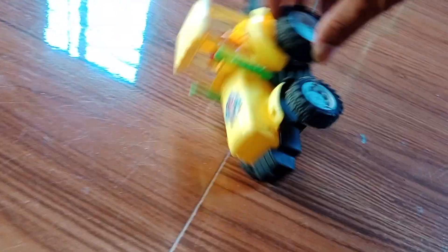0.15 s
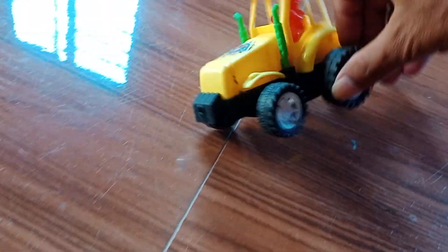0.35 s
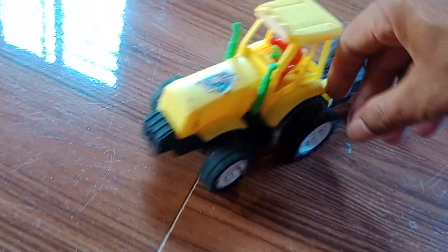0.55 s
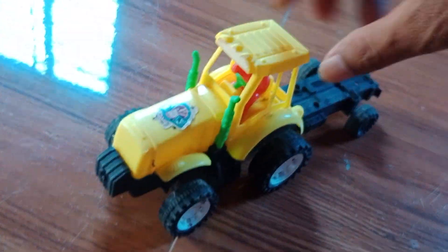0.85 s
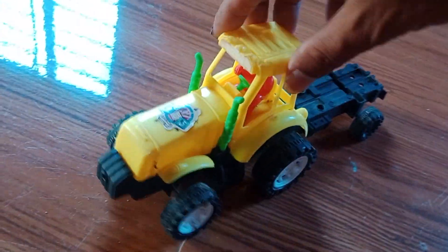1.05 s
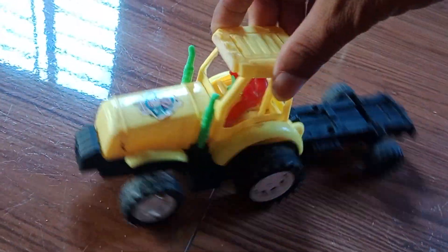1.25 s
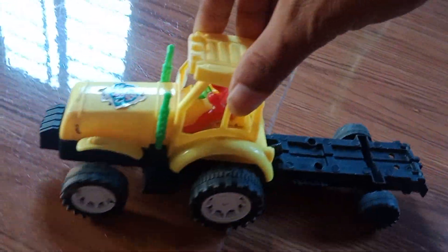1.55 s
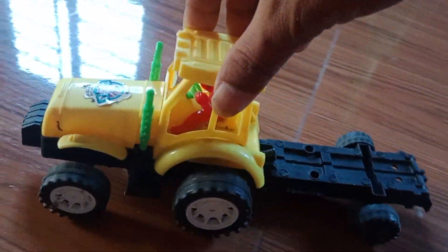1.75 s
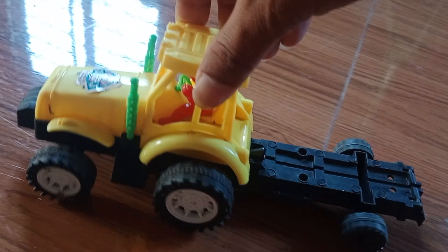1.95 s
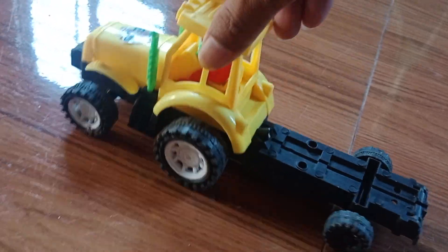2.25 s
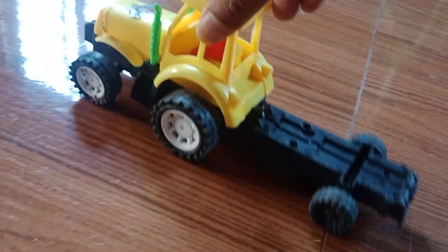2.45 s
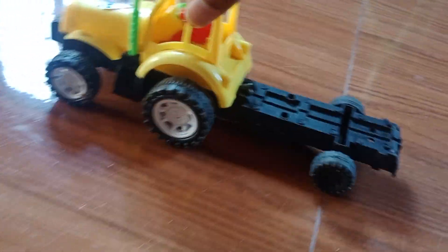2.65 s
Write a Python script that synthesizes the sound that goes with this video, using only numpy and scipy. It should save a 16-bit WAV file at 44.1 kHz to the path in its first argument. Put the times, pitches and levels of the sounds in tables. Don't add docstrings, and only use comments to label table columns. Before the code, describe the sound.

Plastic toy wheels scrape across a wooden floor, with clattering first, a brief lull, then steady grinding

```python
import sys
import numpy as np
from scipy import signal
from scipy.fft import rfft, irfft
from scipy.io import wavfile
from scipy.ndimage import uniform_filter1d

SR = 44100
rng = np.random.default_rng(int(sys.argv[2]) if len(sys.argv) > 2 else 0)


def generate_wav(signal):
    frames = np.transpose(np.atleast_2d(signal))
    scaled = np.clip(frames, -1, 1) * 32767
    pcm = np.round(scaled).astype(np.int16)
    wavfile.write(sys.argv[1], SR, pcm)


def field_ratio(decibels):
    return 10 ** (np.asarray(decibels, dtype=float) / 20)


N = 123479

# columns pitch_hz, level_db
ROOM_SPECTRUM = [(40, -14), (110, 3), (500, -8), (1500, 5), (3000, -16), (6600, -28), (7800, -1.5),
                 (15000, -11)]
# columns time_s, level_db, high_boards_db
FLOOR_LOAD = [(0, -57.5, 0), (.1, -58, -28), (.22, -59, -6), (.27, -63.5, -11), (.8, -62.5, -12.5),
              (.87, -70, -26), (.97, -74.5, -3), (1.12, -61.5, -7.5), (1.42, -65, -11.5), (1.6, -49, -13),
              (1.7, -48.5, -4), (1.78, -71, 12), (2.0, -57, -11), (2.3, -60, 8), (2.37, -63, -16),
              (2.6, -56, -4), (2.7, -51.5, -10), (2.8, -54, -2)]
# columns pitch_hz, width_hz, level_db
LOW_BOARD_MODES = [(101.4, 6.5, 9.5), (118.4, 71, 3.5), (162, 75, -10)]
HIGH_BOARD_MODES = [(224, 30, 1.5), (307, 27.4, 1.5)]
# columns start_s, length_s, first_hz, last_hz, level_db
BOARD_THRUMS = [
    (1.68, 0.21, 335, 320, -45.5),
    (1.9, 0.425, 315, 240, -51),
    (1.8, 0.19, 228, 223, -52.5),
    (2.4, .11, 221.4, 229, -50),
    (2.61, 0.182, 295, 370, -48.5),
    (1.56, 0.068, 130, 116, -49),
    (1.64, 0.1, 100, 104, -48),
    (2.62, 0.22, 130, 119, -49.5),
    (2.33, .08, 230, 207, -58),
]
# columns start_s, peak_db, pitch_hz, length_ms
WHEEL_KNOCKS = [(.0, -37.5, 2770, 9), (0.234, -19, 2600, 3.7), (.599, -38, 1330, 4.5),
                (.617, -28, 2600, 4.9), (.618, -27.5, 1420, 5), (.78, -37.5, 1240, 16),
                (.978, -63, 1900, 3), (.999, -44, 1330, 9.8), (1.021, -48, 1300, 6.5),
                (1.068, -45, 800, 11), (1.2, -35, 1300, 3.7), (1.089, -38, 2990, 5.4),
                (1.359, -41, 1270, 4)]
# columns start_s, peak_db, crack_hz
PART_TICKS = [(.001, -40, 8700), (.009, -45, 10000), (.035, -48, 8000), (.066, -38, 10600),
              (.098, -42, 9000), (.104, -42, 11000), (.117, -39, 12000), (.128, -39, 9000),
              (.15, -36, 10500), (.168, -33.5, 10100), (.185, -34.5, 9000), (.204, -38, 10500),
              (0.235, -33.5, 8800), (.286, -41, 12000), (.306, -42, 12500), (.368, -44, 9000),
              (.435, -42, 10000), (.579, -58, 10000), (.6, -42, 7400), (.652, -51.5, 11000),
              (.707, -61, 9000), (.8, -63, 9000), (.899, -67, 10000), (1.022, -63, 11000),
              (1.09, -37.5, 8800), (1.179, -47, 10000), (1.397, -40, 8460), (1.43, -41, 9000),
              (1.93, -40, 7500), (2.064, -37, 8200)]
# columns pitch_hz, level_db
TICK_SPECTRUM = [(1500, -30), (3000, -9), (6300, -9), (8000, 0), (10000, -2), (12500, -5), (15500, -9)]
# columns start_s, length_s, first_hz, last_hz, level_db
TYRE_SQUEAKS = [(.835, 0.088, 1600, 1690, -58.5), (.65, 0.27, 3900, 3670, -74.5),
                (.69, 0.18, 3230, 3200, -75), (.71, 0.096, 2500, 2680, -68), (.845, .11, 3340, 3200, -76.5),
                (.88, 0.095, 2520, 2290, -73), (.895, .09, 4620, 4580, -76),
                (.94, 0.065, 1290, 1284, -64.5), (.96, .1, 2290, 2175, -72), (1.01, 0.118, 760, 793, -49.5),
                (1.2, 0.096, 760, 790, -48.5), (2.56, 0.14, 2075, 2100, -47.5)]
# columns time_s, force_db, speed_tilt_db_per_octave, cab_boom_db
CONTACT = [(.05, -48.5, -1.5, -1), (.085, -35, -5, 0), (.18, -35.5, 1.5, 5), (.33, -40.5, 1.5, -4),
           (0.537, -37.5, 0, -13.5), (.59, -47, -1.5, -12), (0.625, -39, -6, -11), (.84, -55, -15.5, 1.5),
           (.95, -79, -11, 13), (1.041, -46, -11.5, -1.5), (1.21, -40.5, -8, 0), (1.411, -37.5, -2.5, -2.5),
           (1.659, -34.5, -3.5, -8), (1.709, -30, -1.5, -6), (2.04, -28, -0.6, -2),
           (2.48, -34, -2.5, -11.5), (2.6, -32, -4.5, -8), (2.8, -36, -3, -3)]
# columns from_s, to_s
HAND_HOLDS = [(0, .07), (.07, .3), (.3, .58), (.58, .84), (.84, 1.0), (1.0, 1.19), (1.19, 1.4), (1.4, 1.69),
              (1.69, 1.79), (1.79, 1.9), (1.9, 2.11), (2.11, 2.4), (2.4, 2.56), (2.56, 2.9)]
# columns pitch_hz, level_db
BODY_SPECTRUM = [(300, -18), (600, -14), (800, -5.5), (1500, -1), (2600, -3.5), (4200, -10.5), (7500, -23),
                 (15000, -46)]
# columns pitch_hz, width_hz, level_db
FIZZ_MODES = [(7090, 790, -14.5), (8220, 1210, -17), (9350, 280, -19.5), (12400, 620, -32)]
# columns pitch_hz, width_hz, level_db
LIFT_MODES = [
    [(774, 26, 10), (1330, 105, 10.5)],
    [(806, 123, -6), (1129, 43, 2), (1380, 180, -2.5), (1614, 100, -3), (2510, 110, -3), (2804, 110, 1)],
    [(970, 43, 1), (1395, 130, -0.5), (1690, 190, -2.5), (2290, 170, -4.5), (2800, 320, -9.5),
     (3200, 230, -17)],
    [(778, 130, 7.5), (1240, 260, 3), (1900, 100, -10), (3780, 100, -12)],
    [(1300, 100, 2), (2330, 120, -12)],
    [(790, 54, 2.5), (1290, 162, 4.5), (1860, 100, -9), (2170, 200, -3), (3000, 310, -10), (3900, 60, -17)],
]
# columns pitch_hz, width_hz, level_db
PUSH_MODES = [
    [(785, 59, -4), (1290, 310, -6.5), (1780, 150, -12), (2330, 230, -11), (2930, 460, -20)],
    [(726, 35, -1), (1424, 260, -1.5), (2370, 200, -2.5), (3300, 80, -8)],
    [(715, 65, -8), (1010, 47, -5), (1450, 120, -14), (2100, 60, -17), (2346, 180, 1.5)],
    [(990, 60, -10), (1457, 210, -2), (2350, 76, -5), (2650, 96, -2), (4080, 150, -14)],
    [(705, 93, -8), (911, 25, 0.5), (1430, 46, -6), (1534, 240, -2.5), (2240, 71, 0), (2500, 170, -4),
     (4060, 110, -17)],
    [(720, 80, -7), (1260, 80, -7), (1560, 120, -1.5), (1950, 63, -6), (2300, 76, -7), (2650, 160, -7),
     (2970, 90, -3.5)],
    [(1200, 100, -10), (1490, 120, -7), (2010, 55, -6), (2780, 370, -6)],
    [(760, 105, -5), (1470, 120, -5), (2600, 640, -17), (3950, 200, -11)],
]
# columns pitch_hz, width_hz, depth (0-1)
PORT_NOTCHES = [(4864, 1500, 0.86), (4870, 690, 0.55), (9390, 700, 0.8), (11350, 650, 0.32),
                (13900, 1400, 0.56), (433, 250, 0.22)]


def evened(x):
    return x / np.sqrt(np.mean(x ** 2) + 1e-20)


def colour(x, points):
    table_hz, level_db = np.transpose(points)
    hz = np.fft.rfftfreq(len(x), 1 / SR)
    gain_db = np.interp(np.log(hz + 1), np.log(table_hz + 1), level_db)
    return irfft(rfft(x) * field_ratio(gain_db), len(x))


def resonate(x, hz, width):
    r = np.exp(-np.pi * width / SR)
    return 2 * signal.lfilter([1 - r], [1, -r * np.exp(2j * np.pi * hz / SR)], x).real


def swaying(x, hz, width):
    turn = np.exp(2j * np.pi * np.cumsum(hz) / SR)
    r = np.exp(-np.pi * width / SR)
    return 2 * (turn * signal.lfilter([(1 - r) ** 2], [1, -2 * r, r * r], x / turn)).real


def slow(top_hz):
    t = np.arange(0, N, 128) / SR
    drift = sum(np.sin(2 * np.pi * (f * t + rng.random())) for f in top_hz * np.geomspace(.2, 1, num=12))
    return np.interp(np.arange(N) / SR, t, evened(drift))


def patches(shape, frames, bins):
    noise = rng.standard_normal(shape[::-1])
    noise = uniform_filter1d(noise, size=frames, axis=0)
    return evened(uniform_filter1d(noise, size=bins, axis=1)).T


def grains(per_s, spread_db):
    chance, excess, strength = rng.random(N), rng.exponential(1, N), rng.standard_normal(N)
    return evened((chance < per_s / SR) * strength * field_ratio(spread_db * np.minimum(excess, 5)))


def singing(rows, rough):
    out = np.zeros(N + SR)
    for s, length, first_hz, last_hz, db in rows:
        shake = uniform_filter1d(rng.standard_normal((2, SR // 2)), size=200)
        shake = evened(uniform_filter1d(shake, size=200))
        u = np.arange(round(length * SR)) / (length * SR)
        hz = (first_hz + (last_hz - first_hz) * u) * (1 + rough * shake[0, :len(u)])
        tone = np.sin(2 * np.pi * np.cumsum(hz) / SR) * field_ratio(db + 3.2 * shake[1, :len(u)])
        out[round(s * SR):][:len(u)] += tone * np.minimum(u / 0.17, 1) * np.minimum((1 - u) / .35, 1)
    return out[:N]


def hiss():
    level_db, flicker_db = -67, 2.5
    z = signal.stft(colour(rng.standard_normal(N), ROOM_SPECTRUM), nperseg=256)[2]
    z = z * field_ratio(flicker_db * patches(z.shape, 5, 14))
    return field_ratio(level_db) * evened(signal.istft(z, nperseg=256)[1][:N])


def room(x):
    echo_db, t60_s = -15, 0.11
    t = np.arange(SR // 4) / SR
    tail = rng.standard_normal(len(t)) * field_ratio(-60 * t / t60_s) * (t > .003)
    tail = signal.lfilter([1], [1, -.6], tail)
    return field_ratio(echo_db) * signal.fftconvolve(x, tail / np.linalg.norm(tail))[:N]


def board_group(bumps, modes):
    out = np.zeros(N)
    for hz, width, db in modes:
        ring = resonate(resonate(bumps, hz, 1.4 * width), hz, 1.4 * width)
        out += field_ratio(db + 3.3 * slow(6.3)) * ring
    return evened(out)


def boards():
    t, (s, load_db, high_db) = np.arange(N) / SR, np.transpose(FLOOR_LOAD)
    bumps = grains(900, 2.4)
    low, high = board_group(bumps, LOW_BOARD_MODES), board_group(bumps, HIGH_BOARD_MODES)
    return field_ratio(np.interp(t, s, load_db)) * (low + field_ratio(np.interp(t, s, high_db)) * high)


def thrums():
    return singing(BOARD_THRUMS, .05)


def knocks():
    out, t = np.zeros(N + 2048), np.arange(2048) / SR
    for s, db, hz, ms in WHEEL_KNOCKS:
        shape = np.minimum(t / 0.0006, 1) * np.exp(-(t / (ms / 1000)) ** 2)
        noise = resonate(rng.standard_normal(2048), hz, 0.53 * hz)
        noise = evened(resonate(noise, hz, 0.53 * hz))
        tone = np.cos(2 * np.pi * hz * t) * np.exp(-t / 0.0023)
        out[round(s * SR):][:2048] += field_ratio(db - 8.5) * resonate((0.8 * noise + 2 * tone) * shape, hz, hz)
    return out[:N]


def ticks():
    crack_ms, tail_ms, tail_db = 2.4, 9, -12
    rattles_per_s, rattles_db = 100, -18
    crack_octaves, crack_db = 0.95, -7
    out, t = np.zeros(N + 2048), np.arange(2048) / SR
    decay = np.exp(-(1000 * t / crack_ms) ** 3) + field_ratio(tail_db) * np.exp(-1000 * t / tail_ms)
    shape = np.minimum(t / 0.00041, 1) * decay
    s_force, force_db, speed = np.transpose(CONTACT)[:3]
    when = np.sort(rng.random(round(rattles_per_s * N / SR))) * N / SR
    small_db = np.interp(when, s_force, force_db + 2 * speed) + rattles_db
    small_db = small_db + 3 * rng.standard_normal(len(when))
    rattles = zip(when, small_db, rng.uniform(7000, 13400, len(when)))
    for s, db, hz in [*PART_TICKS, *rattles]:
        tint = [(f, g + max(crack_db * (np.log2(f / hz) / crack_octaves) ** 2, -10)) for f, g in TICK_SPECTRUM]
        out[round(s * SR):][:2048] += field_ratio(db) * evened(colour(rng.standard_normal(2048), tint)) * shape
    return out[:N]


def squeaks():
    return singing(TYRE_SQUEAKS, .014)


def shell(hits):
    wobble, wander_hz, wander_db = 0.019, 7, 1.1
    t = np.arange(N) / SR
    out = colour(hits, BODY_SPECTRUM)
    for hz, width, db in FIZZ_MODES:
        out += field_ratio(db) * resonate(hits, hz, width)
    for (a, b), modes in zip(HAND_HOLDS, [*LIFT_MODES, *PUSH_MODES]):
        grip = np.clip((t - a) / 0.016 + .5 + (a == 0), 0, 1)
        grip = grip * np.clip((b - t) / 0.048 + .5, 0, 1)
        part = slice(max(round((a - .06) * SR), 0), round((b + .06) * SR))
        for hz, width, db in modes:
            path_hz = hz * (1 + wobble * slow(wander_hz)[part])
            ring = swaying(hits[part], path_hz, 1.71 * max(width, 30))
            out[part] += grip[part] * field_ratio(db + 1 + wander_db * slow(wander_hz)[part]) * ring
    return out


def scrape():
    pivot_hz, boom_top_hz, top_ease, patch_db = 1400, 1040, 0.69, 1.4
    t, (s, force_db, tilt, boom_db) = np.arange(N) / SR, np.transpose(CONTACT)
    hits = grains(14000, 1.5) * field_ratio(0.36 * slow(70))
    hz, frames, z = signal.stft(shell(hits), SR, nperseg=512)
    octaves = np.log2(np.maximum(hz, pivot_hz) / pivot_hz)[:, None]
    slope = np.minimum(octaves, 2.0) - top_ease * np.maximum(octaves - 2.0, 0)
    boom = 1 / (1 + (hz[:, None] / boom_top_hz) ** 8)
    gain_db = slope * np.interp(frames, s, tilt) + boom * np.interp(frames, s, boom_db)
    z = z * field_ratio(gain_db + patch_db * patches(z.shape, 14, 3))
    return field_ratio(np.interp(t, s, force_db) + 10) * signal.istft(z, SR, nperseg=512)[1][:N]


def scene():
    toy = ticks() + knocks() + squeaks() + scrape()
    return (hiss() + boards() + thrums() + room(toy) + toy)[None]


def low_pass(x):
    return signal.sosfilt(signal.butter(12, 16780, fs=SR, output="sos"), x)


def record(dry):
    x = dry[0]
    for hz, width, depth in PORT_NOTCHES:
        x = x - min(depth, 1) * signal.lfilter(*signal.iirpeak(hz, hz / width, SR), x)
    x = signal.sosfilt(signal.butter(2, 95, "high", fs=SR, output="sos"), x)
    x = signal.oaconvolve(x, signal.firwin(511, 15450, window=("kaiser", 9), fs=SR), "same")
    return low_pass(x[None])


dry = scene()
out = record(dry)
generate_wav(out)
```